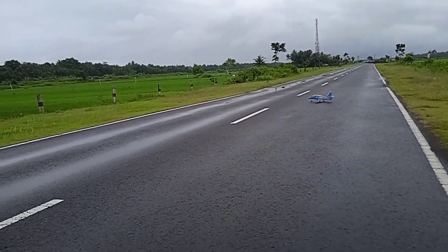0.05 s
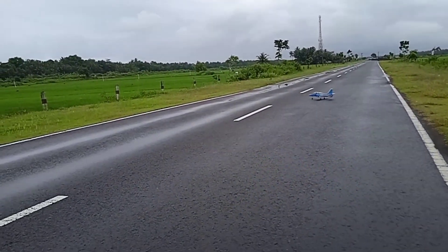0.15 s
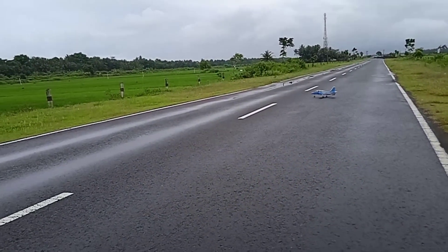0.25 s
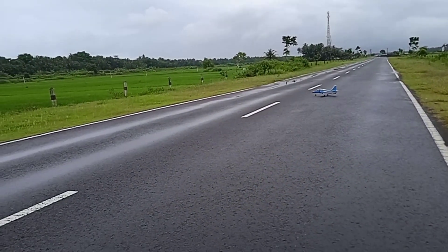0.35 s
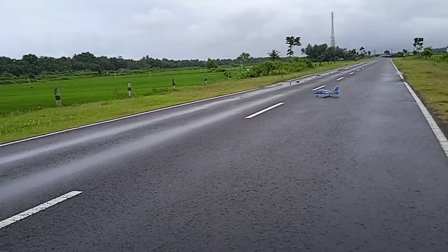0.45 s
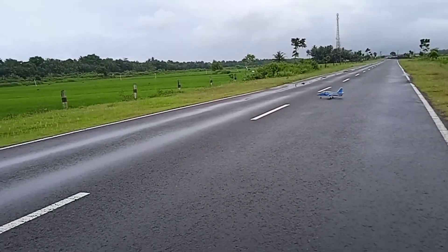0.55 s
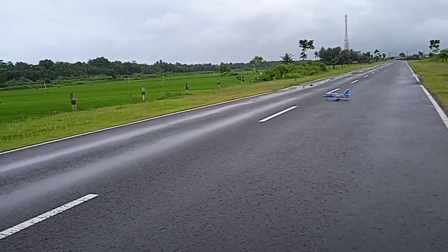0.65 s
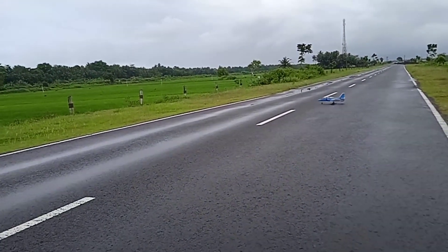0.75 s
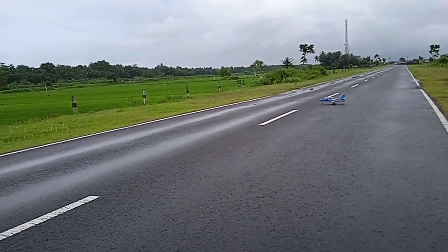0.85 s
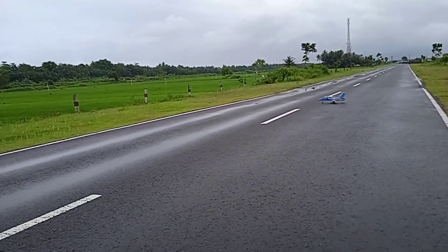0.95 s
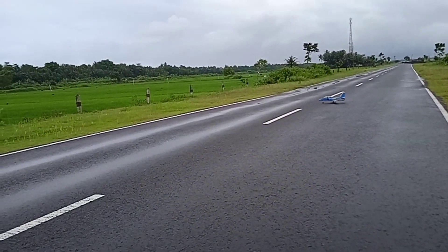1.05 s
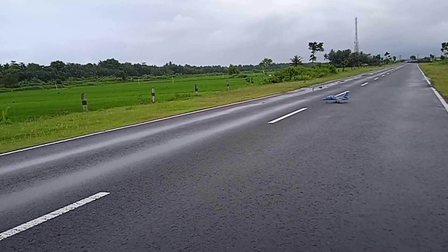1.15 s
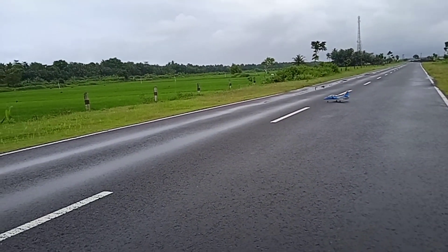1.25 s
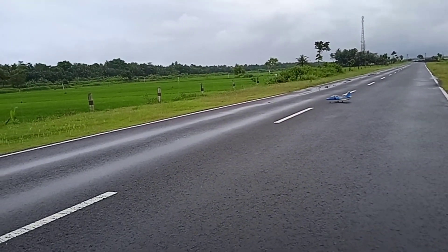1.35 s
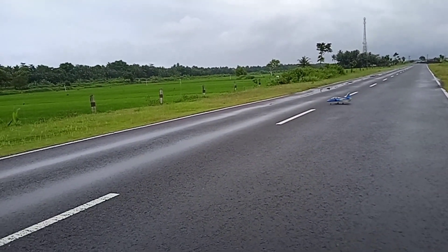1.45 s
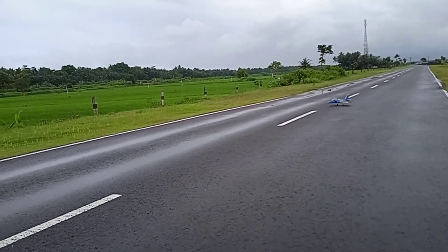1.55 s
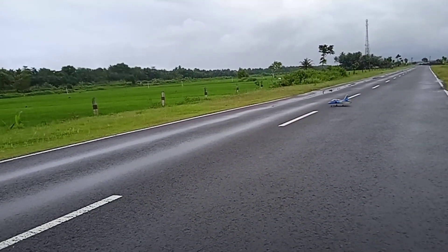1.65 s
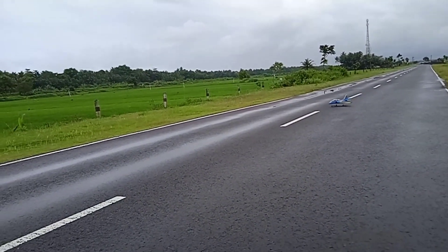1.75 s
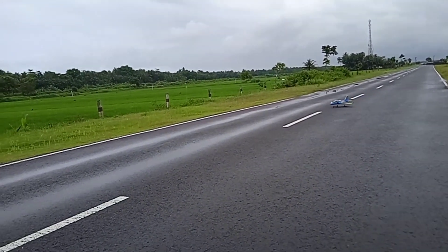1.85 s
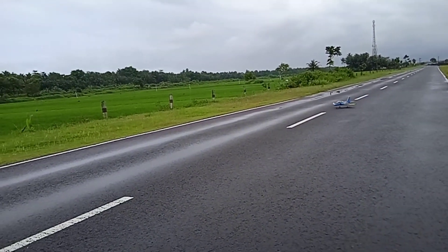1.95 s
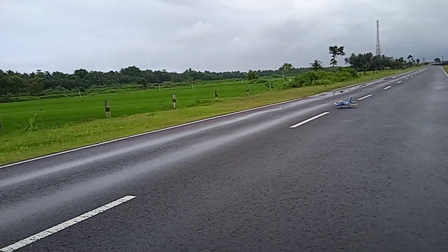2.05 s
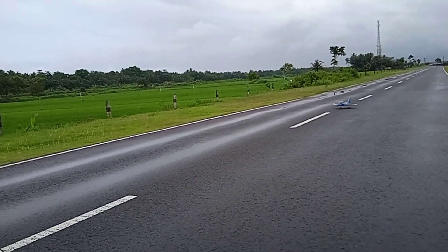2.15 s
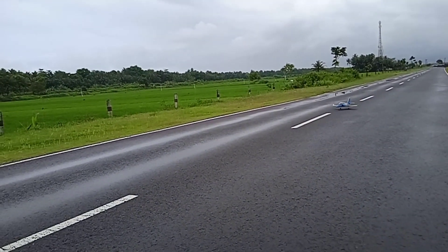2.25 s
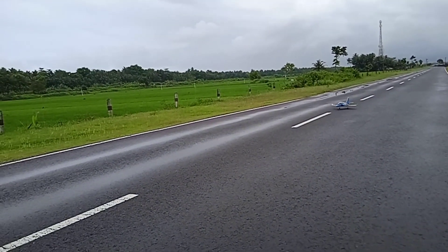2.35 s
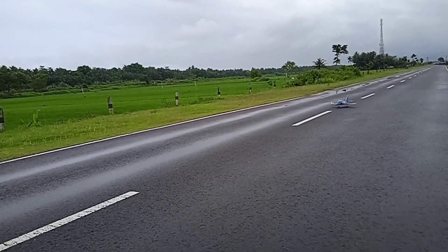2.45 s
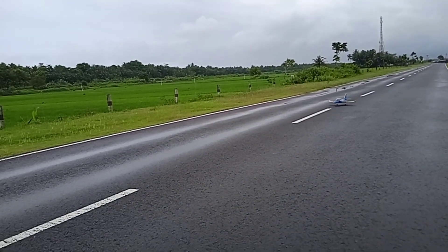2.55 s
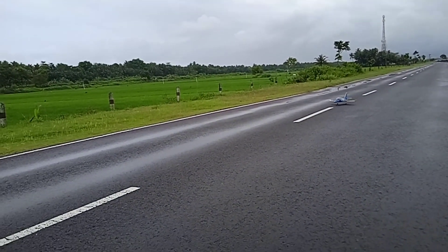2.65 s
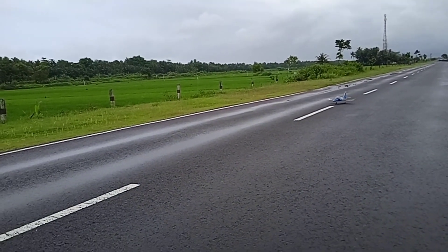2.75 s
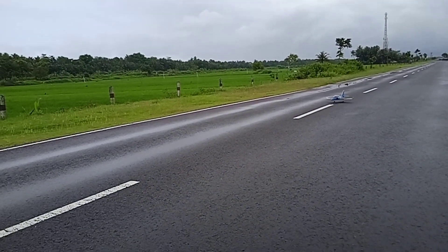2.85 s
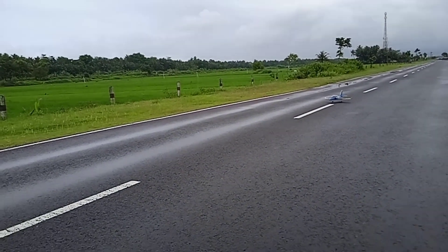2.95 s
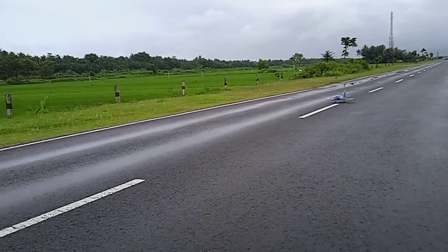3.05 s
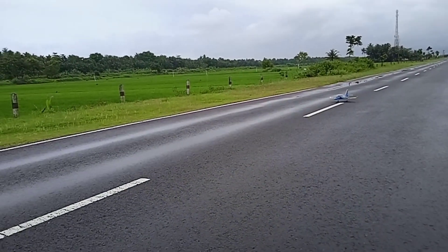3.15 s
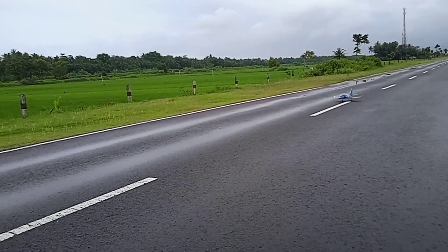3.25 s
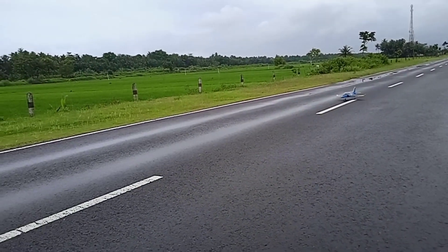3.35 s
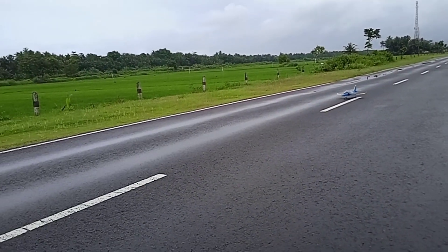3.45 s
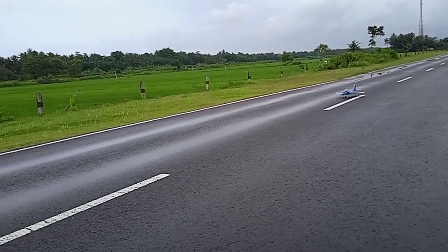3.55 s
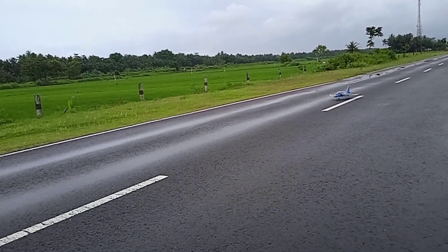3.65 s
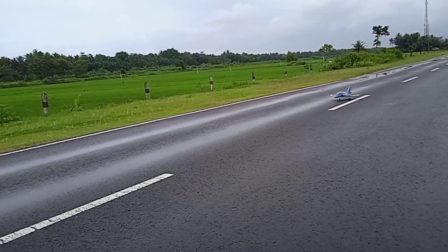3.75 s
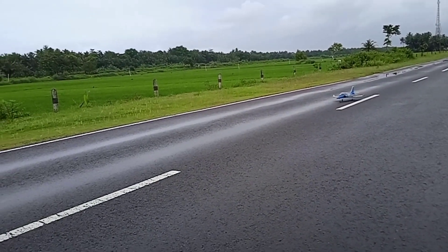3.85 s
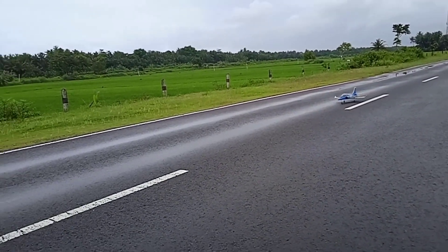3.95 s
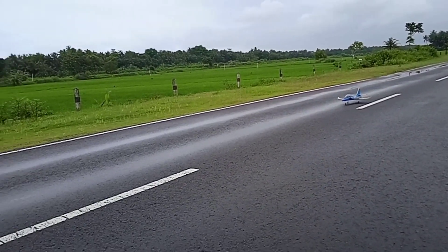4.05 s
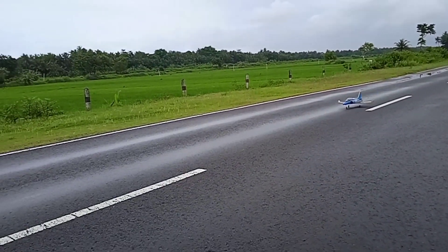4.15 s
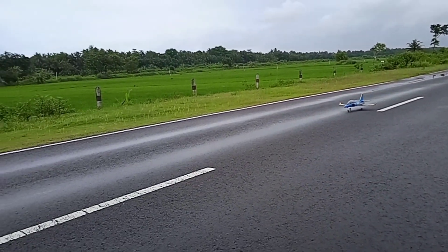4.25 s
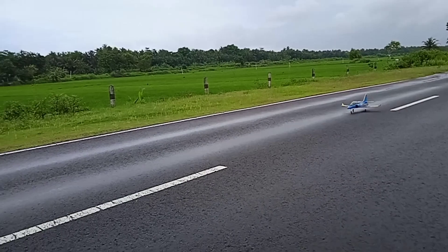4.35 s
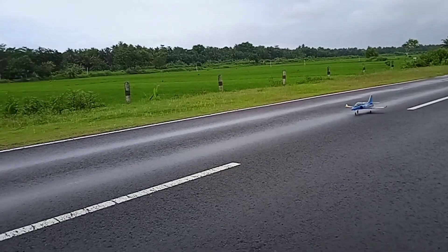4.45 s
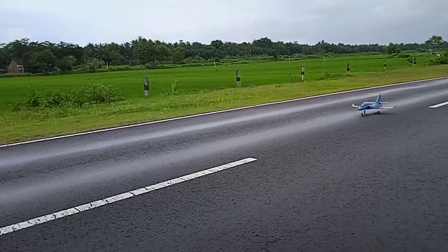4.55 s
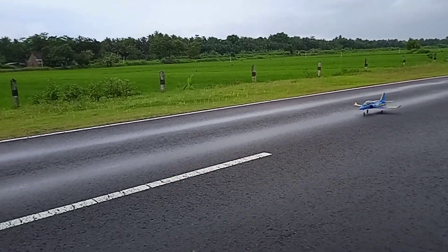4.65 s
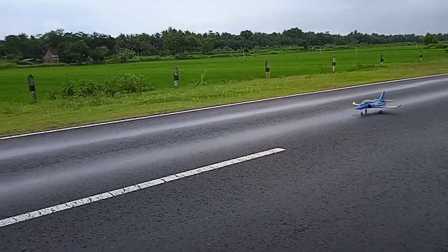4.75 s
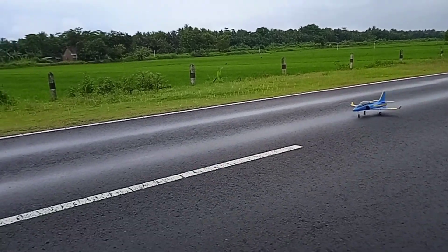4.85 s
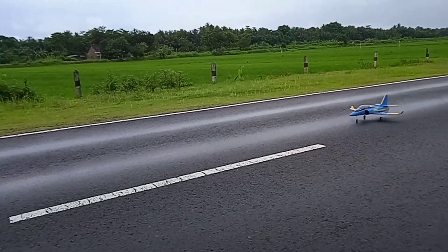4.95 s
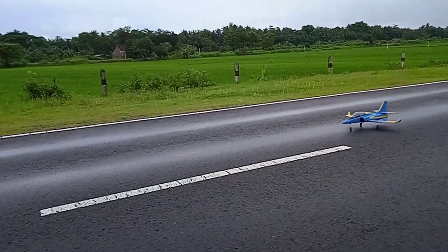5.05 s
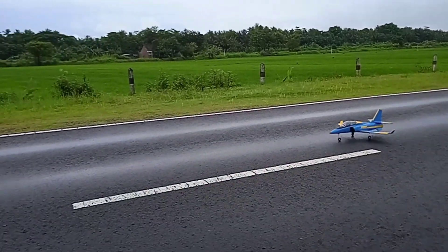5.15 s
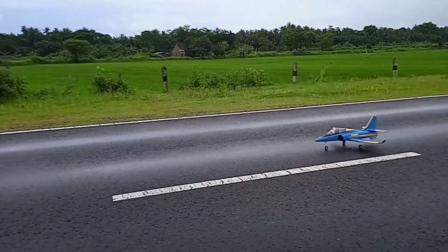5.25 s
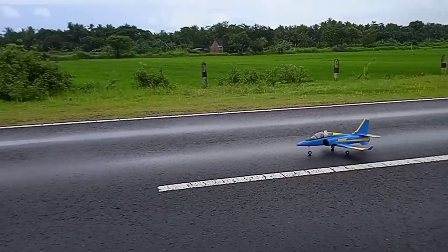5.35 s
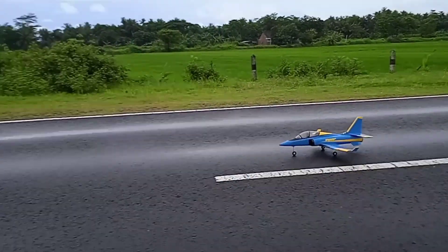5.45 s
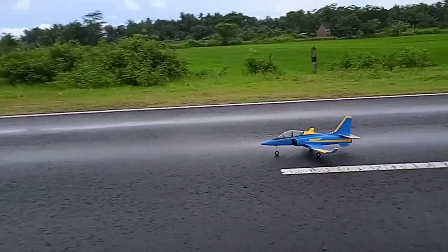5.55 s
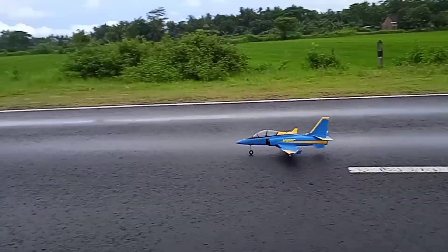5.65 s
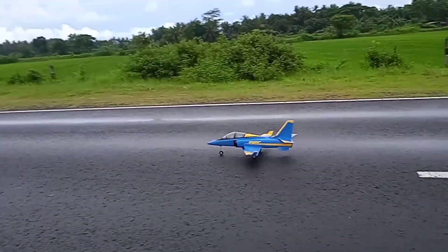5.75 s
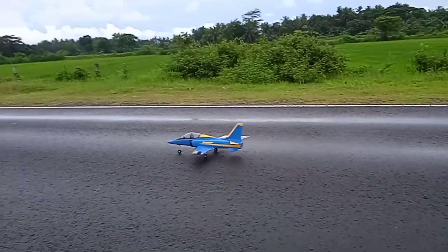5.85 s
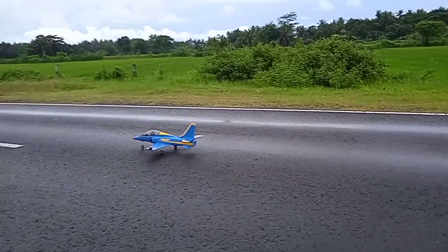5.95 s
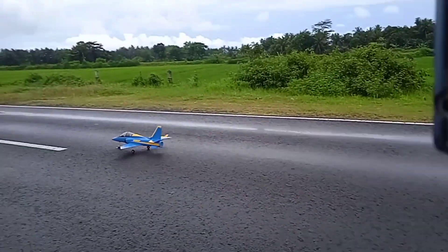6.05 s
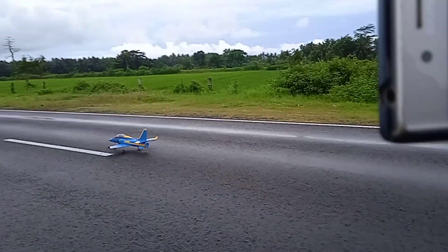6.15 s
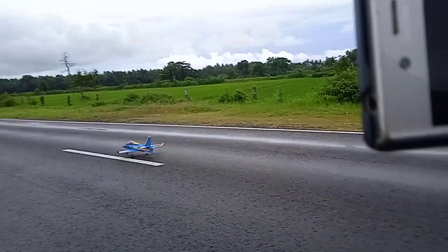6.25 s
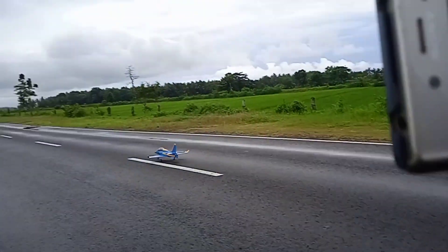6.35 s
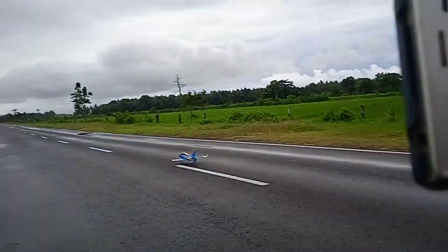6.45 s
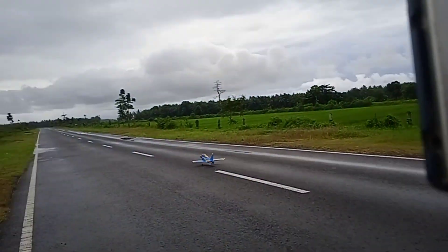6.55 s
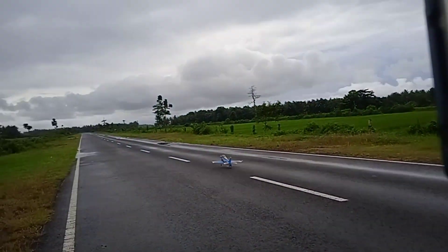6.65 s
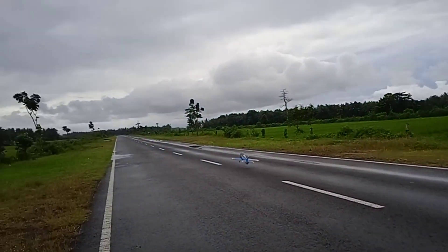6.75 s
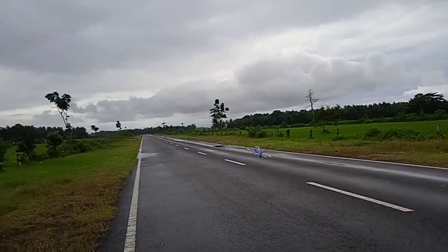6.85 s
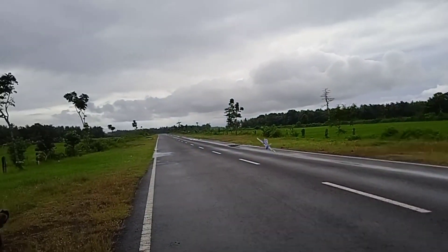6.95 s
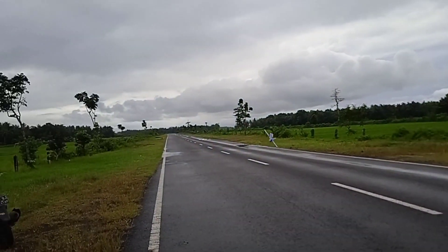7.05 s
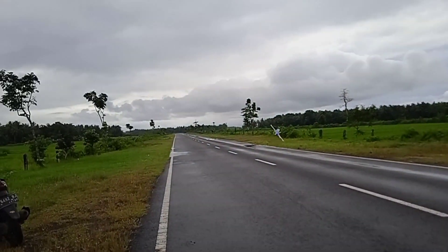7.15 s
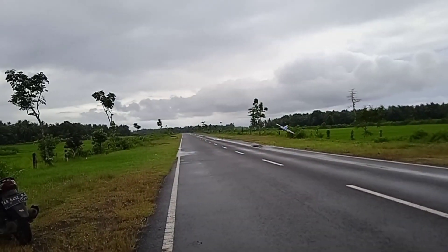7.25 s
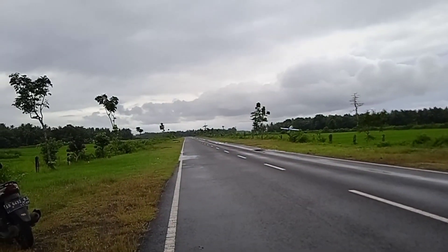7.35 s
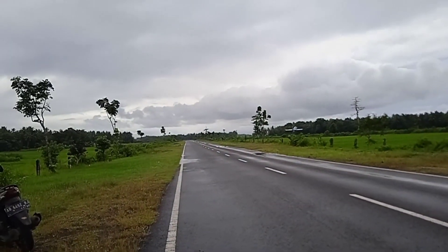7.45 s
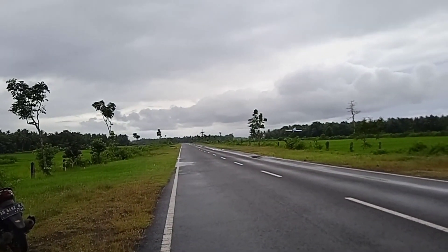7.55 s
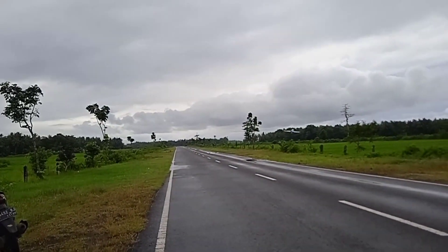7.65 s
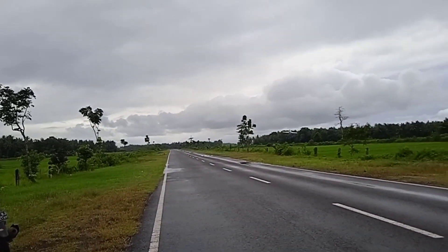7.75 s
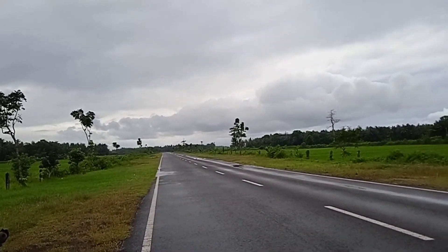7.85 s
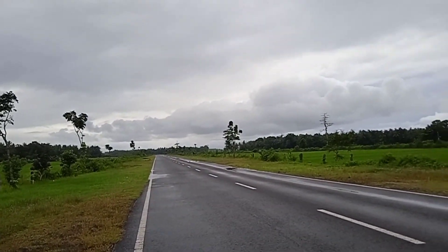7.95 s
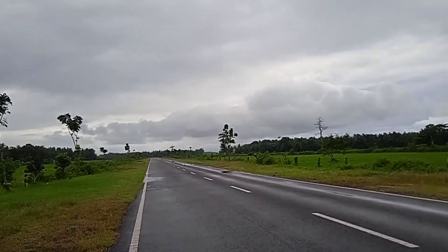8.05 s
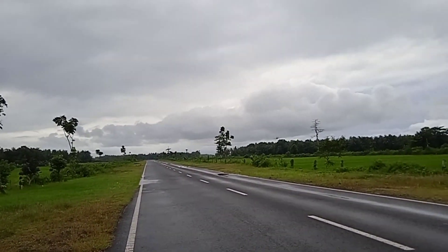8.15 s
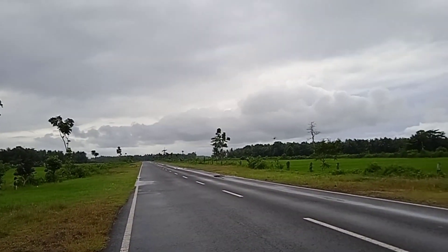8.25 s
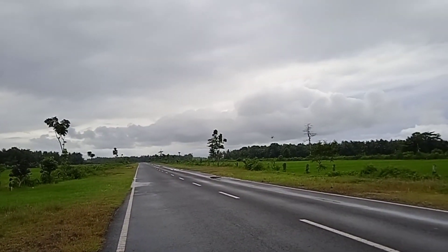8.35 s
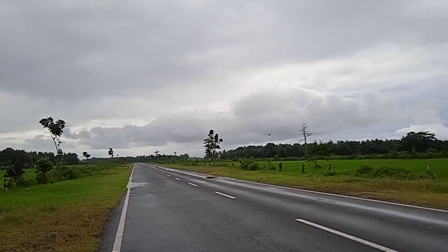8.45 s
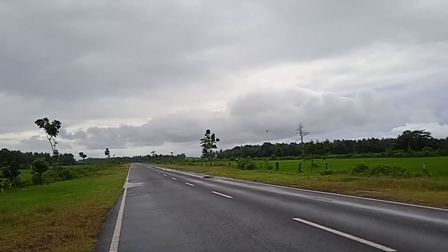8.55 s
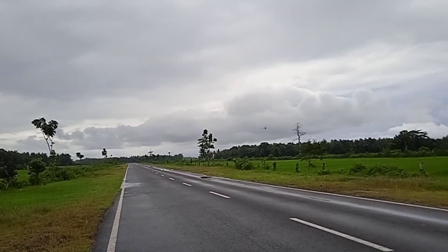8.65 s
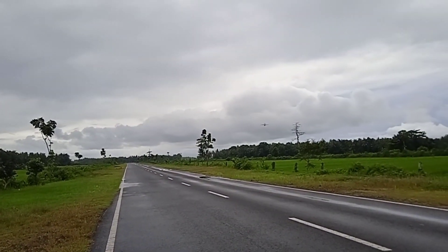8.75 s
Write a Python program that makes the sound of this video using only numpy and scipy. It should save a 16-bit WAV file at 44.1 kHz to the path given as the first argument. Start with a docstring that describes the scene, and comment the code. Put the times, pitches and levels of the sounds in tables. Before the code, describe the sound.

Quiet country air outdoors: a very faint far hum, thin high insect hiss, and a few ticks and a scrape near the hand-held microphone in the first half second. A small electric ducted-fan model jet, distant on a road, spools up from 0.3 to 0.7 s, with a rough mid-pitched airframe buzz around 1 s and again at 1.7-2.5 s. Tiny far bird chirps come near 0.6, 1.4 and 2.4 s. From 2.6 s the throttle climbs in steps to full by about 4.8 s; whine and airy hiss grow and flutter. It rushes past around 5.8 s, loud and broad, the whine throbbing. At 6.3 s a sharp tick and short scrape coincide with a piercing blade-tone peak. Pitch drops, low wind thumps cluster at 6.5-7.4 s, and the hollow, comb-coloured hiss fades with distance until 8.8 s; faint ticks near 8.45 s.

```python
"""Country air with a far hum and insects lies under everything, with light wind bumps, close ticks and
scrapes and a few bird chirps.
A small electric ducted-fan jet spools up on a road, rolls past a hand-held microphone and climbs away.
Shaft orders and an eleven-blade whine are sines; duct hiss, body rumble, hum and buzz are shaped noise.
The asphalt echo combs the hiss and the blade tone, its delay growing as the jet lifts off."""
import sys
import numpy as np
from scipy import signal
from scipy.fft import rfft, irfft
from scipy.io import wavfile
from scipy.ndimage import uniform_filter1d

SR = 44100
rng = np.random.default_rng(int(sys.argv[2]) if len(sys.argv) > 2 else 0)


def volts_from_decibels(level):
    """Turn decibel levels (scalar or array-like) into linear amplitude factors."""
    exponent = np.asarray(level, float) / 20
    return 10 ** exponent


def store_wav(level_fs):
    """Save 16-bit WAV to argv[1]."""
    pcm = np.round(np.clip(np.atleast_2d(level_fs), -1, 1) * 32767)
    wavfile.write(sys.argv[1], SR, pcm.T.astype(np.int16))


N = 388080  # 8.8 s

# short-time grid: frequency in Hz down, time in seconds across
HZ = np.fft.rfftfreq(1024, 1 / SR)[:, None]
TIME = np.arange(N // 256 + 5) * 256 / SR


def evened(x):
    """Scales to rms 1."""
    return x / np.sqrt(np.mean(x ** 2) + 1e-20)


def columns(rows, t):
    """Reads every column of a table at the positions t of its first column."""
    s, *values = np.transpose(rows)
    return [np.interp(t, s, v) for v in values]


def read(points, hz):
    """Reads a spectrum on a log-frequency axis."""
    f, value = np.transpose(points)
    return np.interp(np.log(hz + 1), np.log(f + 1), value)


def add(mix, s, sound):
    """Mixes a sound in at second s."""
    part = mix[max(round(s * SR), 0):][:len(sound)]
    part += sound[:len(part)]


def band(x, hz, width):
    """One resonance of gain 1."""
    return signal.lfilter(*signal.iirpeak(min(hz, SR / 2.5), max(hz / width, .3), SR), x)


def drift(smooth):
    """Random wander of rms 1, averaged twice over so many seconds."""
    size = max(int(smooth * SR), 1)
    return evened(uniform_filter1d(uniform_filter1d(rng.standard_normal(N), size), size))


def noise(shape, patchy_db):
    """Random short-time spectra of the given magnitude, with drifting patches."""
    a, b, patches = rng.standard_normal((len(TIME), len(HZ), 3)).T
    patches = evened(uniform_filter1d(uniform_filter1d(patches, size=10, axis=0), size=10, axis=1))
    z = (a + 1j * b) * shape * volts_from_decibels(patchy_db * patches)
    return signal.istft(z, nperseg=1024, noverlap=768)[1][:N] / np.sqrt(3 * len(HZ))


# Still air round the microphone. Each row: frequency in Hz, relative density in dB per Hz.
AIR_SPECTRUM = [(25, -54), (60, -5.5), (130, 2.5), (320, -11.5), (600, -15), (1200, -21), (2500, -19.5),
                (5000, -25.5), (7000, -19.5), (7900, -30), (9000, -70), (12500, -42), (15600, -47.5)]
AIR_DB = -64.5  # rms of the whole background


def field():
    """Still background as shaped noise; its bass comes in lumps of wind."""
    shape = volts_from_decibels(read(AIR_SPECTRUM, HZ))
    wind = evened(uniform_filter1d(rng.standard_normal(len(TIME)), size=6))
    lumps = volts_from_decibels(1.7 * wind * np.exp(-(HZ / 220) ** 2))
    return volts_from_decibels(AIR_DB) * evened(noise(shape * lumps, patchy_db=1.96))


# The hum from far off. Each row: time in seconds, level in dB.
DRONE_LEVEL = [(0, -78), (.5, -66), (1.2, -76), (4, -68), (8, -82), (8.55, -63.5), (8.8, -72)]
DRONE_HZ, DRONE_WIDTH_HZ = 157, 30


def drone():
    """A low rough hum from far off, perhaps traffic: noise through one narrow resonance."""
    shape = 1 / (1 + (2 * (HZ - DRONE_HZ) / DRONE_WIDTH_HZ) ** 2)
    return noise(evened(shape) * volts_from_decibels(columns(DRONE_LEVEL, TIME)[0]), patchy_db=1.5)


def insects():
    """A far chorus in the fields: one hissing treble band that flickers fast."""
    shape = np.exp(-((HZ - 11000) / 750) ** 2) * np.ones(len(TIME))
    return volts_from_decibels(-82.0 + 2 * drift(0.001)) * evened(noise(shape, patchy_db=-2.5))


# Throttle moves. Each row: start in seconds, length in seconds, shaft speed in Hz it settles at.
THROTTLE_MOVES = [(0, .19, 280.7), (.315, .116, 346.6), (.435, .204, 416), (.636, .138, 429.7),
                  (1.097, .205, 419.8), (1.49, .122, 433.8), (1.612, .266, 440.1), (2.583, .066, 464.6),
                  (2.657, .081, 515.5), (2.735, .077, 531.6), (2.812, .28, 544.4), (3.094, .25, 589.2),
                  (3.344, .114, 632.6), (3.636, .12, 640.5), (3.883, .11, 695.1), (4.542, .101, 722.6),
                  (4.645, .158, 783.5)]
IDLE_HZ, FULL_HZ, ROTOR_LAG_S = 295.3, 783.5, .043
# Rolling past: the speed follows an S-curve, and the jet passes 5.5 m from the microphone.
TOP_M_PER_S, HALF_SPEED_S, SPEEDUP_S = 34.385, 9.141, 7.545
PASS_S, ASIDE_M, SOUND_M_PER_S = 5.819, 5.537, 343
TURN_FROM_S, TURN_TO_S = 0.7, 3.1  # from side-on, the nose swings to the microphone


def motion(t):
    """Shaft speed in Hz, Doppler factor, distance in m, and facing (nose on 1, tail on -1)."""
    step = t[1] - t[0]
    before = [IDLE_HZ] + [hz for _, _, hz in THROTTLE_MOVES]
    change = sum((hz - old) * np.clip((t - s) / length, 0, 1)
                 for (s, length, hz), old in zip(THROTTLE_MOVES, before))
    lag = np.exp(-step / ROTOR_LAG_S)
    shaft_hz = IDLE_HZ + signal.lfilter([1 - lag], [1, -lag], change)
    speed = TOP_M_PER_S * (1 + np.tanh((t - HALF_SPEED_S) / SPEEDUP_S)) / 2
    along = np.cumsum(speed) * step
    along -= np.interp(PASS_S, t, along)
    distance = np.hypot(along, ASIDE_M)
    turned = np.clip((t - TURN_FROM_S) / (TURN_TO_S - TURN_FROM_S), 0, 1)
    facing = -along / distance * turned
    doppler = 1 / (1 + speed * along / distance / SOUND_M_PER_S)
    return shaft_hz, doppler, distance, facing


# Echo strengths. Each row: time in seconds, share off the road, share off the microphone's holder.
ECHO_SHARE = [(0, 0.46, 0.08), (2.7, 0.63, 0.18), (4.2, 0.15, 0.12), (5, 0.66, 0.16), (5.7, 0.58, 0.07),
              (6.05, 1, 0.31), (6.3, 0.82, 0.43), (6.5, 0.76, 0.65), (6.8, 0.3, 0.79), (7, 0.54, 0.23),
              (7.3, 0.84, 0.29), (8, 0.82, 0.33), (8.8, 1, 0.58)]
# Echo paths. Each row: time in seconds, delay off the road in ms, delay off the holder in ms.
ECHO_DELAY = [(0, .22, 1.6), (2.7, .19, 1.5), (4.2, .14, 1.27), (5, .13, 1.2), (6.05, .145, 1.3),
              (6.3, .12, 1.42), (6.66, .07, 1.51), (6.88, .095, 1.52), (7, .15, 1.52), (7.1, .22, 1.52),
              (7.3, .39, 1.53), (7.4, .445, 1.54), (7.6, .51, 1.57), (7.8, .55, 1.58), (8.4, .62, 1.62),
              (8.8, .72, 1.68)]
ROAD_TURN = 0.05  # phase shift of the grazing bounce, radians


def road_echo(hz, t):
    """Gain of direct sound plus road bounce; rough road and stirred air scatter the echo's treble."""
    share = np.clip(columns(ECHO_SHARE, t)[0], 0, 1)
    delay_ms = columns(ECHO_DELAY, t)[0]
    phase = 2 * np.pi * hz * delay_ms / 1000 - ROAD_TURN
    return abs(1 + share * volts_from_decibels(-.6 * hz / 1000) * np.exp(-1j * phase))


def lifted(modes, hz):
    """dB that a tone gains from the airframe modes it lies near."""
    return sum(gain_db / (1 + (2 * (hz - mode_hz) / width) ** 2) for mode_hz, width, gain_db in modes)


# Blade tone, swelling where its beam sweeps past. Each row: time in seconds, level in dB before echo.
BLADE_LEVEL = [(0, -96), (.42, -101), (.56, -71), (1.3, -71), (1.97, -69), (2.3, -83), (2.66, -79),
               (2.78, -61.5), (3.25, -57.5), (3.7, -59), (3.96, -57.5), (4.5, -53), (4.95, -62.5),
               (5.29, -50), (5.45, -58), (6.0, -60), (6.19, -42.5), (6.33, -38.5), (6.62, -51), (6.76, -48),
               (6.97, -47.5), (7.24, -52), (7.45, -65.5), (8.8, -72.5)]
# Brief dropouts and flares of it. Each row: time in seconds, half length in seconds, change in dB.
BLADE_FADES = [(0.79, .02, -22), (0.932, 0.023, -16), (1.14, 0.049, -14), (1.22, .03, -24),
               (1.366, 0.031, -9), (1.55, 0.045, -12), (2.43, .04, -4), (2.63, 0.037, -20),
               (3.324, .02, -7), (3.413, .02, -10), (3.617, .04, -10), (3.742, 0.028, -16),
               (3.844, .05, -22), (5.14, 0.068, -20), (5.363, 0.027, -22), (5.665, .02, 9.5),
               (6.665, .03, -3)]
# Double blade tone. Each row: time in seconds, level in dB.
DOUBLE_LEVEL = [(0, -102), (.7, -83), (1, -92), (3.3, -95), (3.5, -76), (4.06, -79), (4.1, -100)]
# Common level of the three lowest shaft orders. Each row: time in seconds, level in dB.
LOW_LEVEL = [(0, -96.5), (.45, -91), (.57, -93), (.7, -86), (2.6, -82), (3.2, -80.5), (3.46, -75),
             (3.6, -85), (4.06, -77), (4.5, -86), (4.9, -76), (5.3, -73.5), (5.7, -69.5), (6.2, -68),
             (6.6, -73.5), (7.1, -84), (7.6, -100), (8.8, -107)]
# Orders 1 to 3 against that level, in dB.
LOW_ORDER_OFFSETS = [0, -8.5, -2.1]
# Airframe modes that lift the low orders. Each row: frequency in Hz, width in Hz, lift in dB.
LOW_MODES = [(290, 42, 14), (333.5, 40, 24), (437, 71, 7.5), (549, 121, 16.5), (621, 65, 19.5),
             (686, 35, 9), (790, 53, 15), (858.6, 42, 16.5), (1327, 317, 20), (1613, 132, 12.5),
             (2420, 140, 10.5)]
# Common level of the weaker shaft orders. Each row: time in seconds, level in dB.
WEAK_LEVEL = [(0, -86), (.35, -93), (.5, -79), (.6, -99), (1.2, -88.5), (2.5, -85), (2.9, -80.5),
              (3.3, -78), (3.6, -80), (4.5, -85), (5.5, -88), (6, -87), (6.5, -72), (7.3, -82), (8.8, -87)]
# The weaker orders. Each row: multiple of the shaft speed, dB over their common level.
WEAK_ORDERS = [(4, -6), (5, -4), (6, 1), (7, -6), (8, -8), (9, -5), (10, -9), (12, -4), (33, -16)]
# Airframe modes that lift the weaker orders. Each row: frequency in Hz, width in Hz, lift in dB.
WEAK_MODES = [(1450, 140, 12.5), (1665, 150, 13), (2280, 410, 0.5), (2490, 180, 5), (3200, 320, 5.5)]
# Commutation against switching. Each row: time in seconds, rising and falling sideband in dB.
SIDEBAND_LEVEL = [(.36, -110, -110), (.42, -82, -100), (.55, -91, -94), (.66, -105, -88), (.78, -115, -115)]
BLADES = 11
# close to the pass the blade tone throbs
THROB_FROM_S, THROB_TO_S, THROB_NULL_S, THROB_PER_S, THROB_DEPTH = 5.39, 6.0, 5.502, 15.1, .6
# switching whistle of the motor controller, falling 30 dB per second from its end time on
SWITCH_HZ, SWITCH_DB, SWITCH_WAVER_DB, SWITCH_END_S = 7922.6, -81, 3, 3


def whine():
    """Shaft orders and controller whistle as sines; turbulence on the path makes the orders flutter."""
    t = np.arange(N) / SR
    shaft_hz, doppler = motion(TIME)[:2]
    shaft_hz = shaft_hz * doppler
    turn = 2 * np.pi * np.cumsum(np.interp(t, TIME, shaft_hz) * (1 + 0.00032 * drift(.01))) / SR

    fade_db = sum(db * np.exp(-((TIME - s) / half) ** 2) for s, half, db in BLADE_FADES)
    blade_db = columns(BLADE_LEVEL, TIME)[0] + fade_db
    depth = THROB_DEPTH * np.clip(20 * np.minimum(TIME - THROB_FROM_S, THROB_TO_S - TIME), 0, 1)
    throb = abs(1 - depth * np.exp(2j * np.pi * THROB_PER_S * (TIME - THROB_NULL_S)))
    blade = np.interp(t, TIME, volts_from_decibels(blade_db) * throb * road_echo(BLADES * shaft_hz, TIME))
    out = blade * volts_from_decibels(1.0 * drift(0.014)) * np.sin(BLADES * turn)
    out += volts_from_decibels(columns(DOUBLE_LEVEL, t)[0] + 1.1 * drift(0.027)) * np.sin(2 * BLADES * turn)

    for k, db in enumerate(LOW_ORDER_OFFSETS, start=1):
        order_db = columns(LOW_LEVEL, TIME)[0] + db + lifted(LOW_MODES, k * shaft_hz)
        level_db = np.interp(t, TIME, order_db)
        out += volts_from_decibels(level_db + 2.2 * drift(.06)) * np.sin(k * turn + .3 * drift(.03))
    for k, db in WEAK_ORDERS:
        order_db = columns(WEAK_LEVEL, TIME)[0] + db + lifted(WEAK_MODES, k * shaft_hz)
        level_db = np.interp(t, TIME, order_db)
        level = volts_from_decibels(level_db + 2.5 * drift(.15) + 3 * drift(.008))
        out += level * np.sin(k * turn + 2 * np.pi * rng.random())

    switch = 2 * np.pi * np.cumsum(np.interp(t, TIME, SWITCH_HZ * doppler)) / SR
    rising_db, falling_db = columns(SIDEBAND_LEVEL, t)
    out += volts_from_decibels(rising_db) * np.sin(switch + 12 * turn)
    out += volts_from_decibels(falling_db) * np.sin(2 * switch - 6 * turn)
    switch_db = SWITCH_DB + SWITCH_WAVER_DB * drift(0.027) + 1.8 * drift(0.01)
    switch_db -= 30 * np.maximum(t - SWITCH_END_S, 0)
    out += volts_from_decibels(switch_db) * np.sin(switch)
    return np.sqrt(2) * out  # so the levels are rms


# Foam body at rest. Each row: frequency in Hz before the shift below, width in Hz, relative level in dB.
BODY_MODES = [(327, 176, -6), (658, 190, -6), (824, 154, -5), (981.6, 180, -2), (1346, 294, -9),
              (1912, 244, -11), (2610, 51, -12.5), (2980, 120, -13), (3350, 79, -9.5)]
# Duct hiss. Each row: frequency in Hz, relative density in dB per Hz.
HISS_SPECTRUM = [(400, -36), (1000, 7), (1900, 20), (2600, 13.5), (3700, 16), (5000, 14), (6500, 14),
                 (7600, 9.5), (8000, 2), (9500, -2), (10300, -3), (12000, -11.5), (13800, -16.5),
                 (15600, -19.5)]
# Colour of the hiss. Each row: time in seconds, treble tilt in dB per kHz, change above 9 kHz in dB.
HISS_COLOUR = [(0, 1.5, 5), (1.15, 0.54, 6), (1.9, 2.1, -3.5), (2.65, 3, -15), (3, 3, -13), (3.5, 2.04, -3),
               (4.7, 1.2, 5), (4.85, 1.5, 8), (5.3, 0.56, 10.5), (5.6, .5, 9), (5.9, 1.38, 4.5),
               (6.15, 2, 5.5), (6.47, 2.5, -5.5), (6.9, 2.5, -3.5), (7.4, 1.5, 0), (8.8, 1.1, 3.5)]
# How the jet radiates. Each row: facing from tail -1 to nose 1, then changes in dB of the rumble,
# the hiss, the lowest body mode and the upper body modes.
RADIATION = [(-1.05, 0.5, 3, -3.5, 1.5), (-0.9, -4, -1, 0, 3), (-0.92, -2.5, -1, 1.7, 3.5),
             (-0.22, -1, 0.8, 0.5, 0), (0.018, 1.3, 1.3, 4, -0.7), (0.53, 0.4, 0.4, 3, -2.3),
             (.8, 2.5, 1.5, -5, 1.5), (1, 3, 1.5, -8, 3), (1, 4.5, 1.5, -6, -2)]
# dB at full throttle about 10 m away; dB per dB of shaft speed
BODY_DB, BODY_GROWTH, DUCT_DB, DUCT_GROWTH = -47, 1, -48, 1.18
SPREAD_M = 2.67  # plume and wheels sound over some length, which flattens the peak of the pass
GROUND_DB_PER_M = 0.2627  # further loss with distance
MODE_FACTOR, MODE_SAG, SAG_S, SAG_LENGTH_S = 0.94, 0.18, 5.95, 0.17  # body modes sag at the pass


def rush():
    """Duct hiss with a hump round the blade tone and rumble in the foam body, both echoed."""
    shaft_hz, doppler, distance, facing = motion(TIME)
    speed_db = 20 * np.log10(shaft_hz / FULL_HZ)
    path_db = -20 * np.log10(np.hypot(distance, SPREAD_M) / 10) - GROUND_DB_PER_M * (distance - 10)
    rumble_db, hiss_db, low_db, upper_db = columns(RADIATION, facing)
    rumble_db = rumble_db + BODY_DB + BODY_GROWTH * speed_db + path_db
    hiss_db = hiss_db + DUCT_DB + DUCT_GROWTH * speed_db + path_db

    tilt_db, top_db = columns(HISS_COLOUR, TIME)
    hump_db = 6.4 * np.exp(-((HZ - BLADES * shaft_hz * doppler) / 700) ** 2)
    colour_db = tilt_db * (HZ / 1000 - 4.0) + top_db * (1 + np.tanh((HZ - 9000) / 800)) / 2
    hiss = evened(volts_from_decibels(read(HISS_SPECTRUM, HZ))) * volts_from_decibels(hiss_db + hump_db + colour_db)

    shift = MODE_FACTOR - MODE_SAG * np.exp(-((TIME - SAG_S) / SAG_LENGTH_S) ** 2)
    modes = [volts_from_decibels(2 * db) / (1 + (2 * (HZ - hz * shift) / width) ** 2) ** 2
             for hz, width, db in BODY_MODES]  # as power
    radiated = modes[0] * volts_from_decibels(2 * low_db) + sum(modes[1:4]) + sum(modes[4:]) * volts_from_decibels(2 * upper_db)
    rumble = np.sqrt(radiated / np.mean(sum(modes), 0)) * volts_from_decibels(rumble_db)

    holder, holder_ms = columns(ECHO_SHARE, TIME)[1], columns(ECHO_DELAY, TIME)[1]
    holder_phase = 2 * np.pi * HZ * holder_ms / 1000
    near_echo = abs(1 + holder * volts_from_decibels(-1.2 * HZ / 1000) * np.exp(-1j * holder_phase))
    flicker = volts_from_decibels(.6 * drift(.02))
    return flicker * noise(np.hypot(hiss, rumble) * road_echo(HZ, TIME) * near_echo, patchy_db=1.2)


# Ticks close by. Each row: time in seconds, peak in dB, pitch in Hz, treble in dB against the ring.
TICK_EVENTS = [(.166, -48, 1890, -30), (.275, -48.5, 4900, -30), (.363, -41.5, 7000, -16),
               (0.366, -49.5, 1700, -30), (.504, -51, 6960, -25), (6.2954, -24, 1480, -45),
               (8.449, -49.5, 3200, -25), (8.4492, -46, 6760, -20)]
# Scrapes close by. Each row: start in seconds, end in seconds, body rms in dB before the fades,
# pitch in Hz, treble in dB against the body.
SCRAPE_EVENTS = [(0.186, 0.23, -52.5, 1830, -8), (0.233, 0.245, -71, 2500, 5),
                 (2.548, 2.558, -59, 1290, -10), (2.95, 2.971, -64, 1500, -14),
                 (6.272, 6.324, -45, 1450, -21)]


def crackle():
    """Ticks as ringing puffs of noise, and scrapes as dense uneven runs of ticks."""
    out, t = np.zeros(N), np.arange(400) / SR
    for s, db, hz, treble_db in TICK_EVENTS:
        puff = rng.standard_normal(len(t)) * np.exp(-t / .0008)
        ring = band(band(band(puff, hz, 2000), hz, 2000), hz, 2000)
        tick = evened(ring) + volts_from_decibels(treble_db) * evened(np.diff(puff, prepend=0))
        add(out, s, volts_from_decibels(db) * tick / abs(tick).max())
    for start, end, db, hz, treble_db in SCRAPE_EVENTS:
        hit, size, sign = rng.random((int((end - start) * SR), 3)).T
        # about 2500 slips per second, few of them large
        slips = (hit < 2500 / SR) * volts_from_decibels(-5.5 * np.log(size + 0.15)) * np.sign(sign - .5)
        body = band(band(slips, hz, 2300), hz, 2300)
        scrape = evened(body) + volts_from_decibels(treble_db) * evened(band(slips, 3900, 2200))
        add(out, start, volts_from_decibels(db) * scrape * signal.windows.tukey(len(slips), .3))
    return out


# Wind on the microphone. Each row: start in seconds, envelope peak in dB, frequency in Hz.
WIND_BUMPS = [(0.558, -49.5, 141), (2.579, -60, 86.1), (2.769, -52, 109), (4.123, -43, 111),
              (4.929, -51, 82.6), (5.066, -44, 110), (6.464, -40.5, 99.6), (6.529, -45, 89.5),
              (6.589, -41, 118), (6.712, -38, 111), (6.854, -42.5, 96), (6.938, -43, 113),
              (7.267, -54, 142), (7.421, -44, 115), (7.924, -48.5, 86.1)]


def bumps():
    """Each puff pushes the membrane for about two cycles."""
    out = np.zeros(N)
    for s, db, hz in WIND_BUMPS:
        cycles = np.arange(int(3.5 * SR / hz)) * hz / SR
        add(out, s, volts_from_decibels(db) * np.sin(2 * np.pi * cycles) * np.exp(-((cycles - 1.6) / 0.54) ** 2))
    return out


# The buzzing panel. Each row: time in seconds, level in dB.
BUZZ_LEVEL = [(.55, -101), (.65, -72), (1, -58), (1.3, -71), (1.55, -86), (1.7, -62.5), (2.5, -68),
              (2.8, -99)]


def buzz():
    """A panel of the airframe buzzes on one rough note at low throttle: narrow-band noise."""
    shape = 1 / (1 + (2 * (HZ - 905) / 30) ** 2)
    return noise(evened(shape) * volts_from_decibels(columns(BUZZ_LEVEL, TIME)[0]), patchy_db=1.5)


# A bird far off. Each row: start in seconds, length in seconds, first pitch in Hz, last pitch in Hz,
# relative level in dB (8 dB below the peak).
BIRD_CHIRPS = [(.64, 0.043, 3150, 3350, -77), (1.43, 0.059, 2975, 2500, -77),
               (2.35, 0.071, 3170, 2460, -74)]


def bird():
    """Short gliding whistles, far off: sines that swell and fade."""
    out = np.zeros(N)
    for s, length, start_hz, end_hz, db in BIRD_CHIRPS:
        hz = np.linspace(start_hz, end_hz, int(length * SR))
        whistle = np.sin(2 * np.pi * np.cumsum(hz) / SR)
        add(out, s, volts_from_decibels(db + 8.0) * np.hanning(len(hz)) * whistle)
    return out


def scene():
    """All sources at the microphone, in one channel."""
    jet = whine() + rush() + buzz()
    surroundings = drone() + field() + insects() + bumps() + crackle() + bird()
    return (jet + surroundings)[None]


def top_cut(x):
    """Nothing passes above the cut-off."""
    return signal.sosfilt(signal.butter(12, 16440, fs=SR, output="sos"), x)


# Microphone port. Each row: frequency in Hz, gain in dB.
PORT_RESPONSE = [(20, -18), (60, -1.5), (13600, -1.5), (14300, 8.5), (15250, 12), (15500, 19.5),
                 (15700, -24)]


def record(dry):
    """The microphone port thins the deep bass and rings in the top octave."""
    hz = np.fft.rfftfreq(N, 1 / SR)
    heard = irfft(rfft(dry, axis=1) * volts_from_decibels(read(PORT_RESPONSE, hz)), N, axis=1)
    return top_cut(heard)


dry = scene()
out = record(dry)
store_wav(out)
```